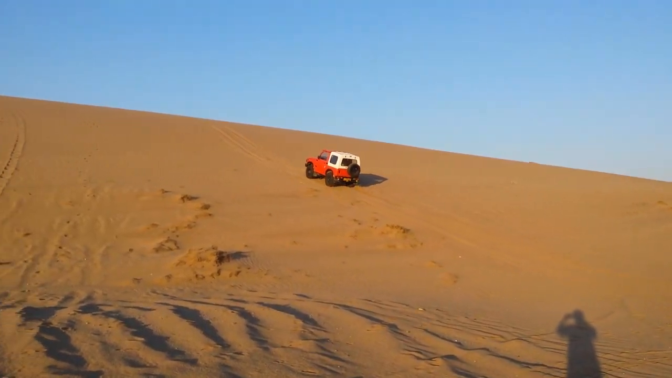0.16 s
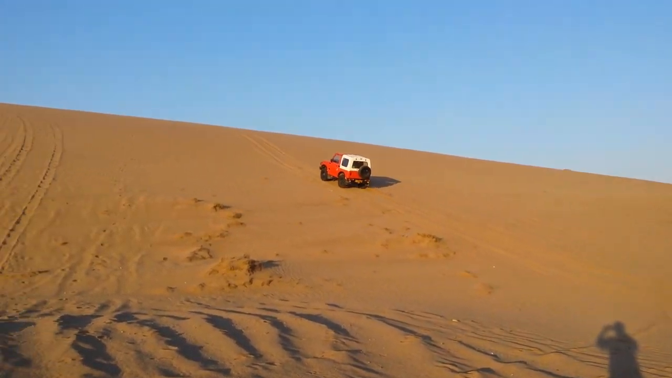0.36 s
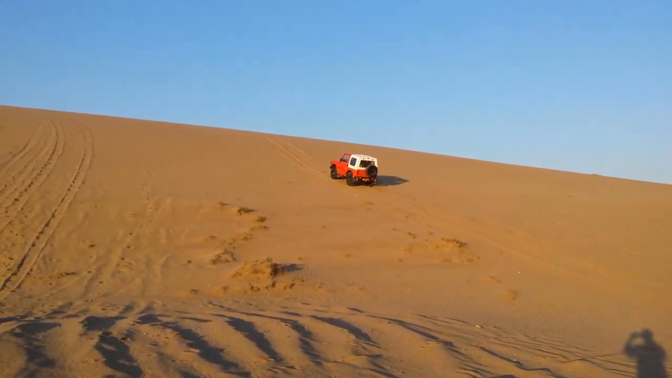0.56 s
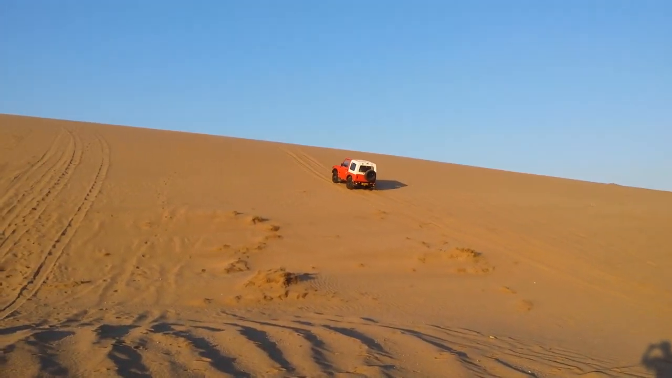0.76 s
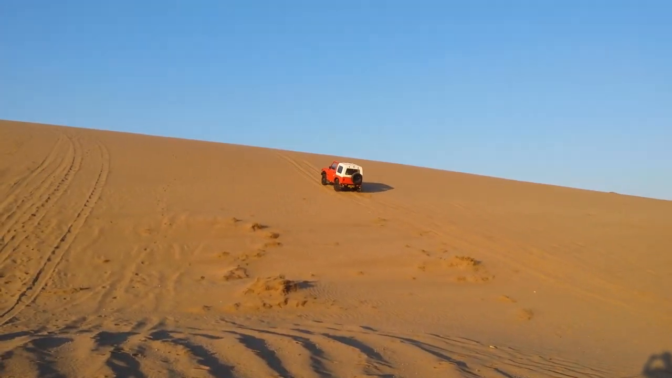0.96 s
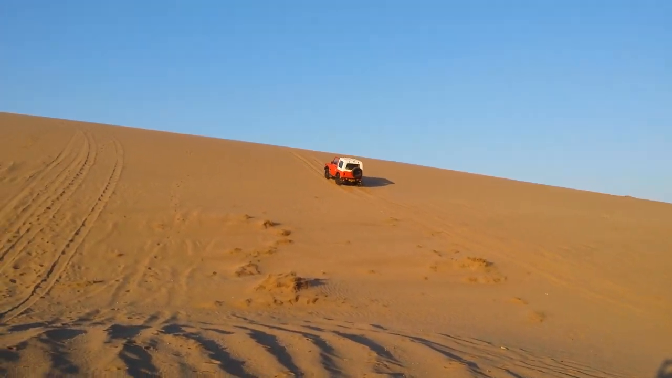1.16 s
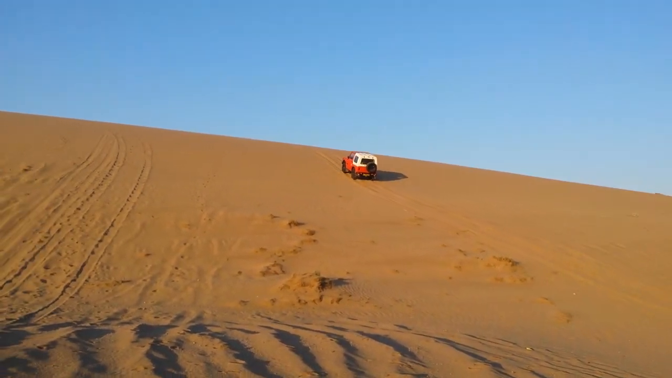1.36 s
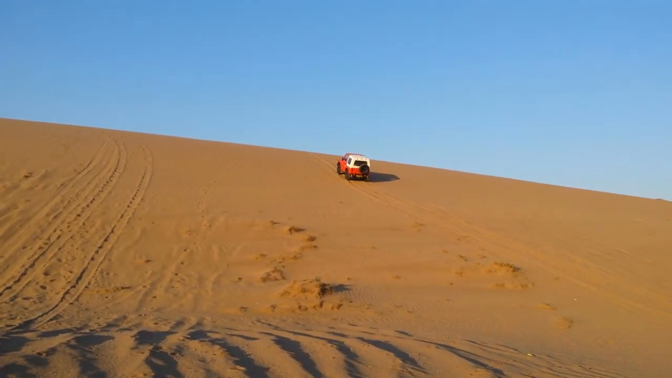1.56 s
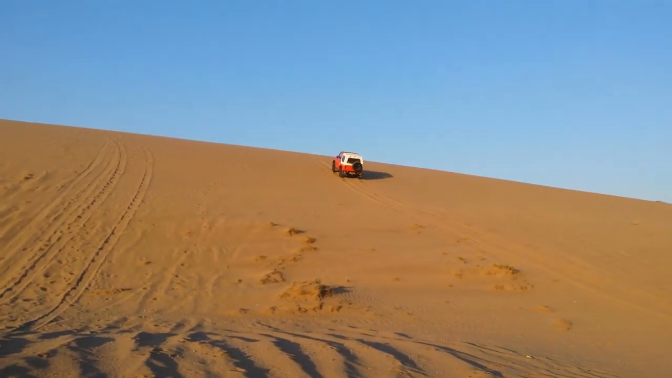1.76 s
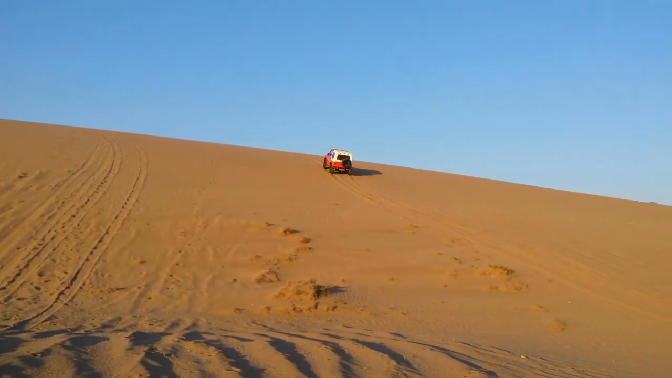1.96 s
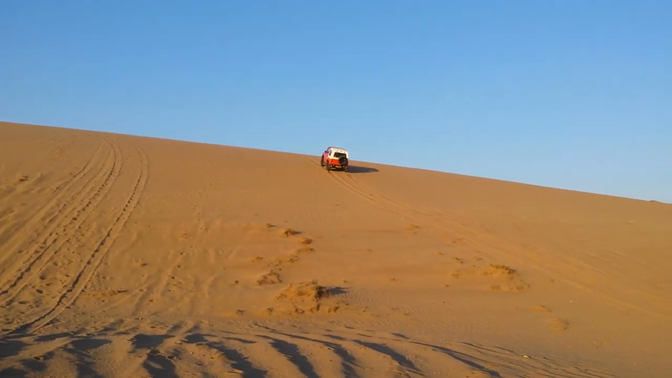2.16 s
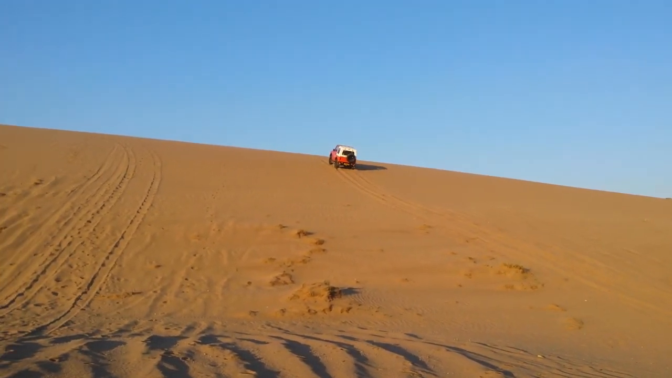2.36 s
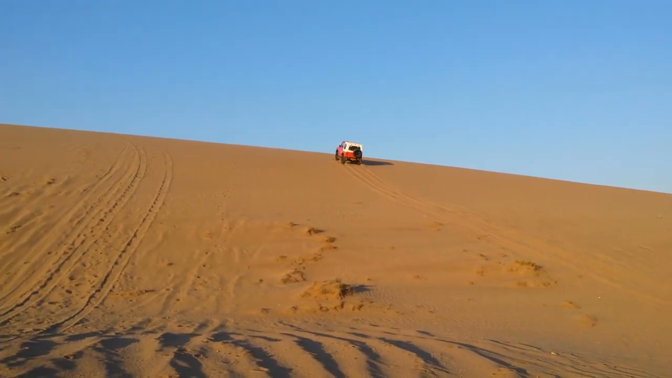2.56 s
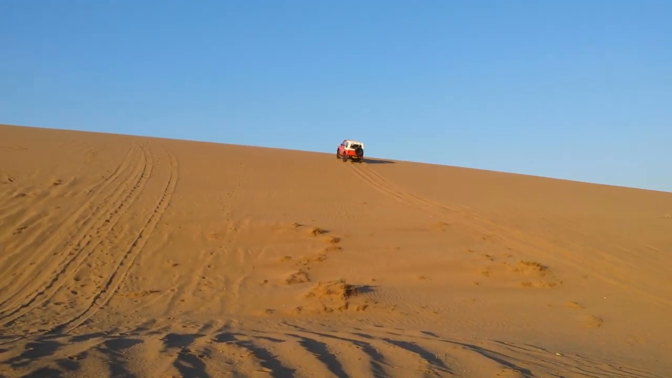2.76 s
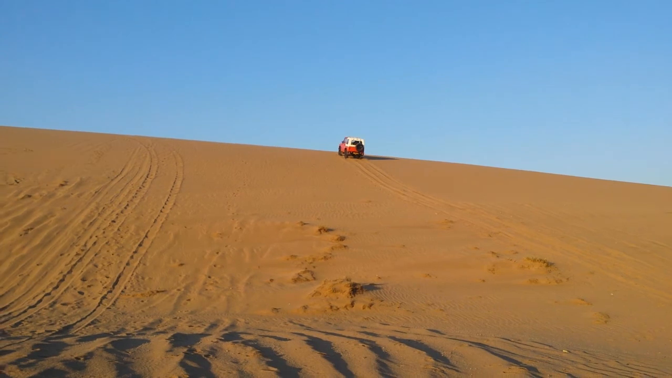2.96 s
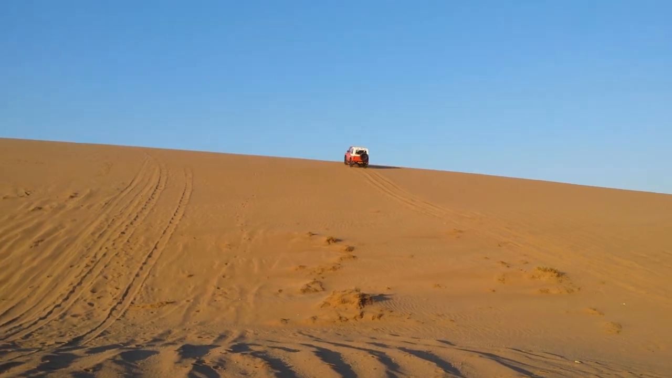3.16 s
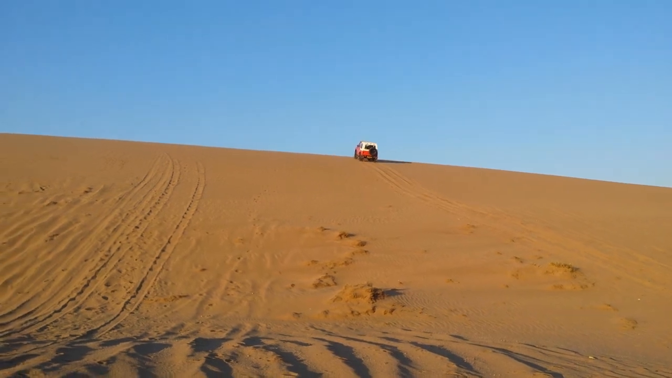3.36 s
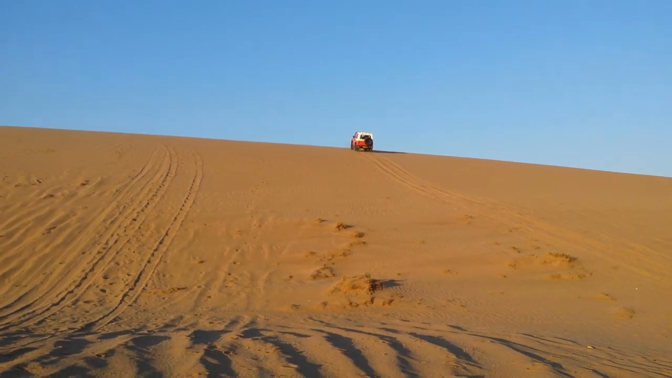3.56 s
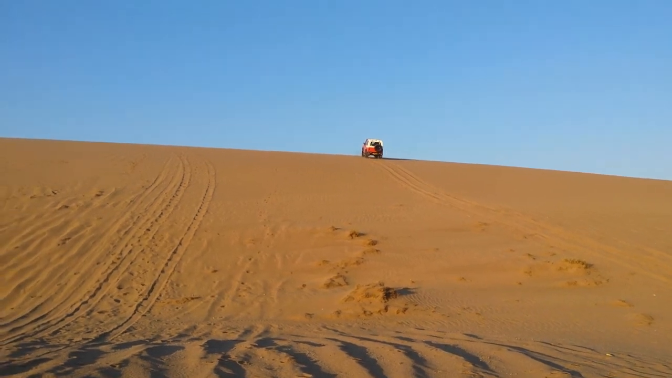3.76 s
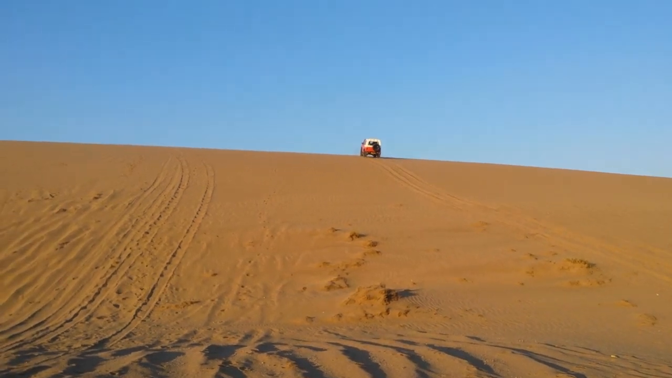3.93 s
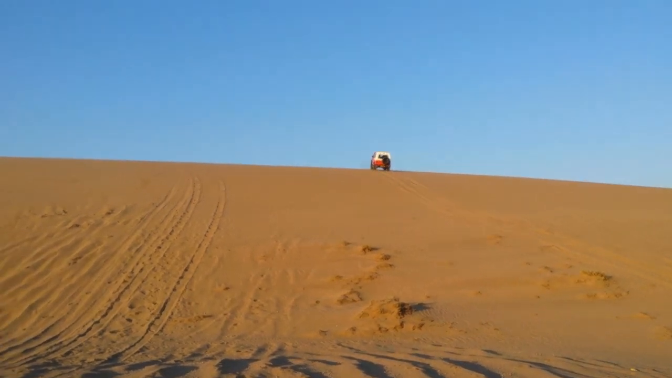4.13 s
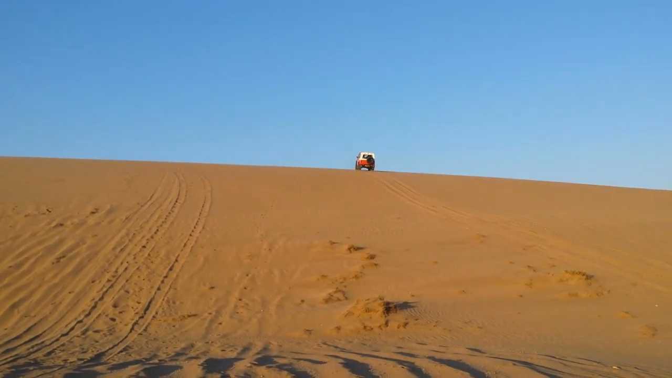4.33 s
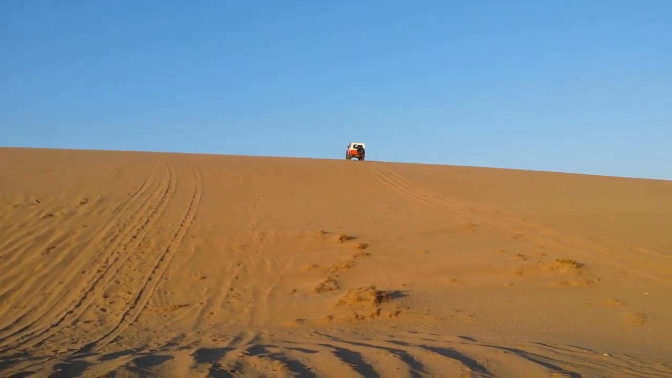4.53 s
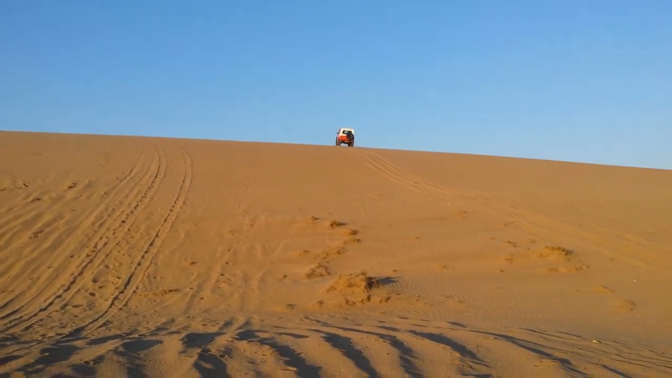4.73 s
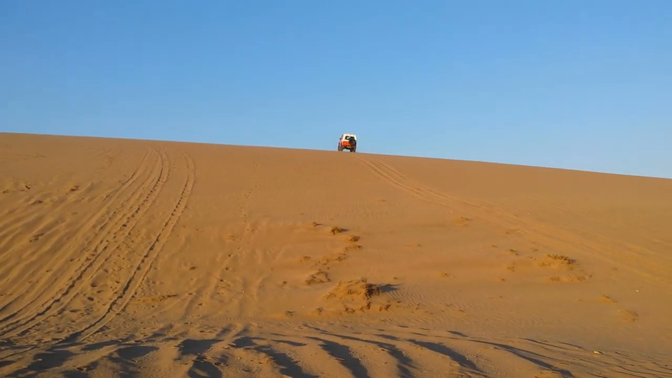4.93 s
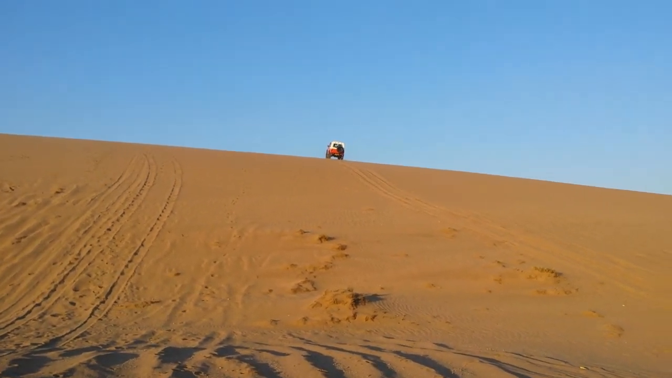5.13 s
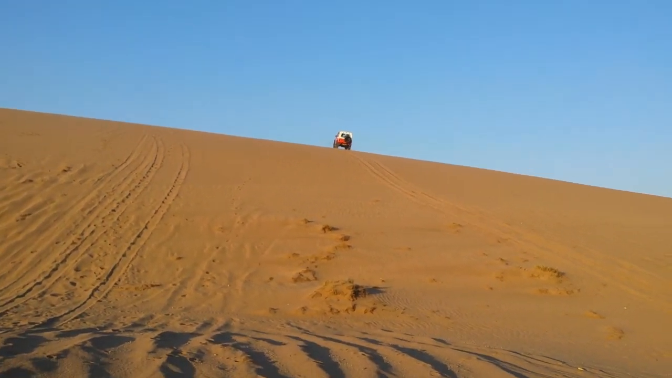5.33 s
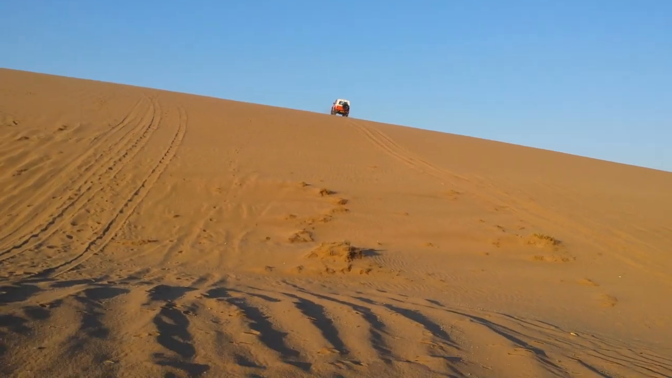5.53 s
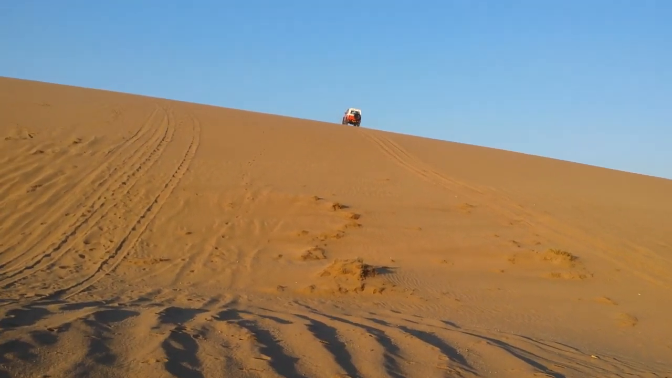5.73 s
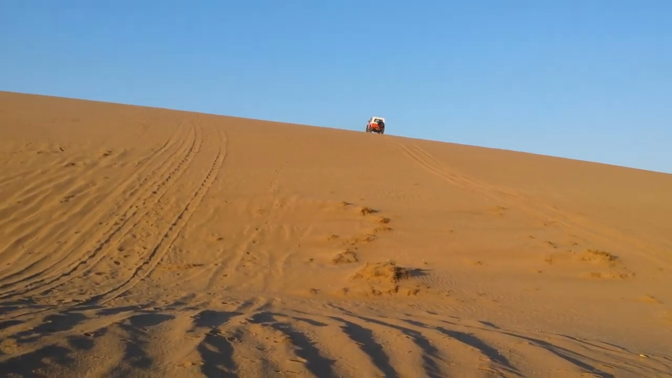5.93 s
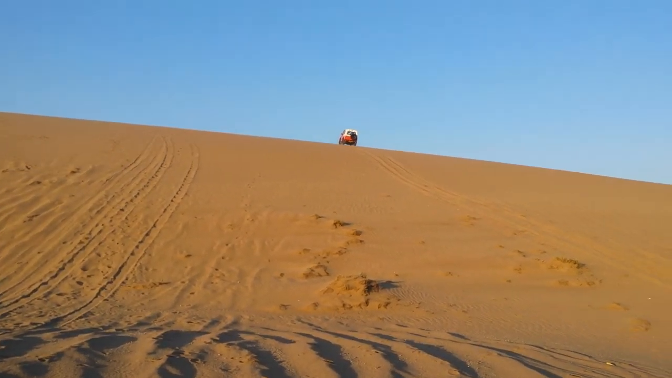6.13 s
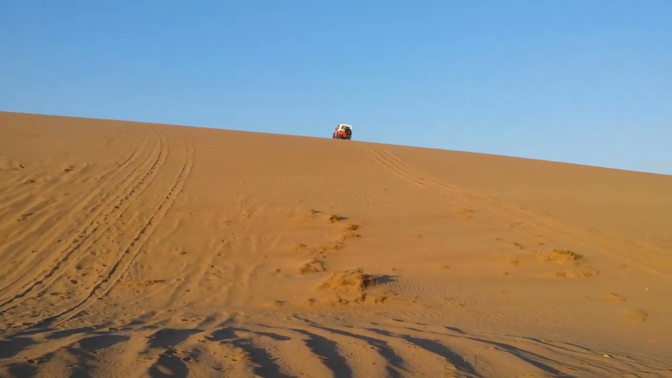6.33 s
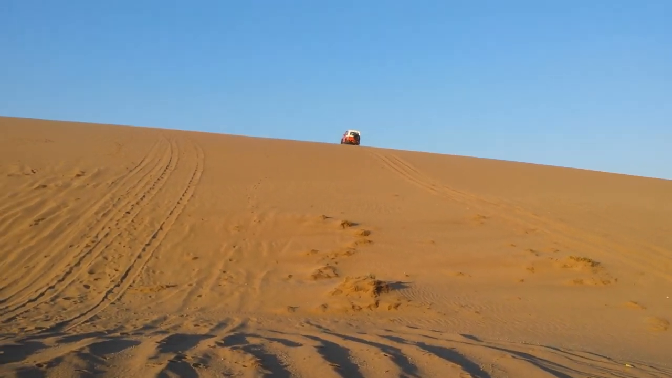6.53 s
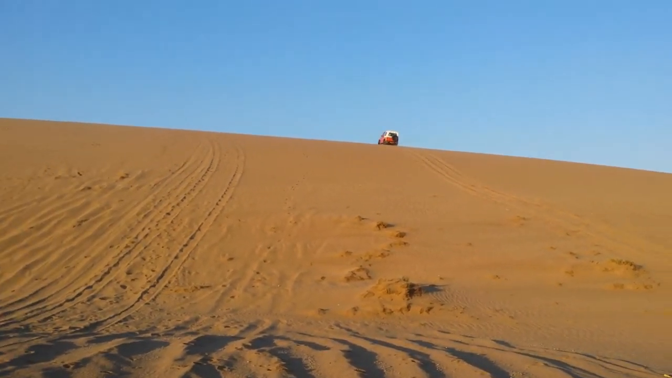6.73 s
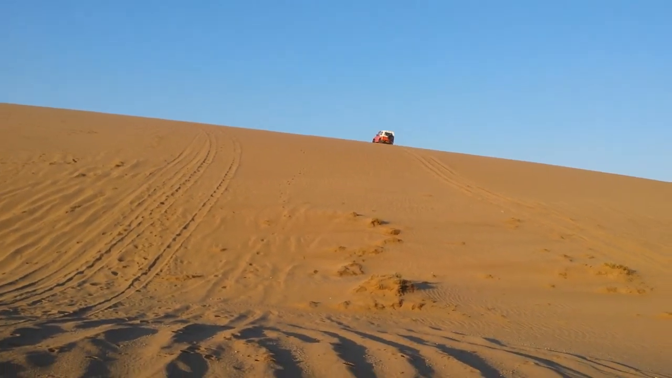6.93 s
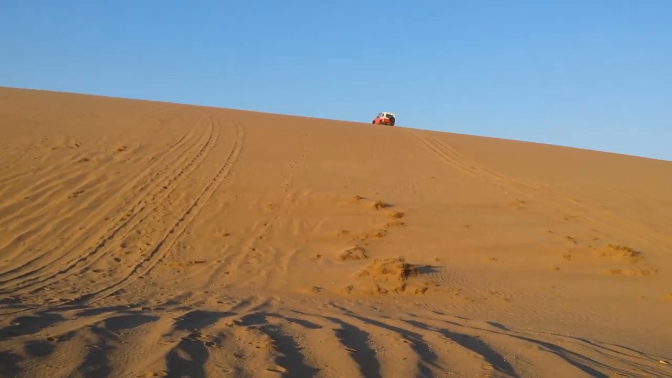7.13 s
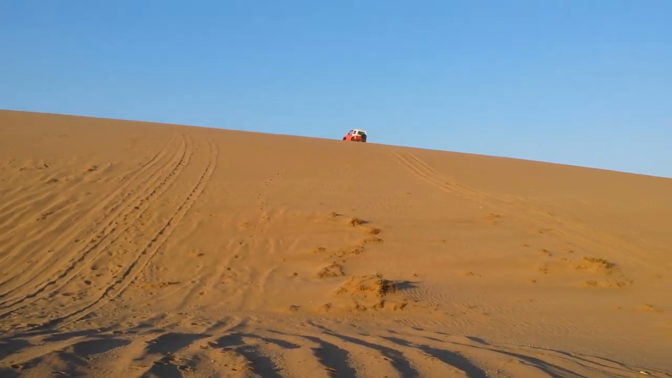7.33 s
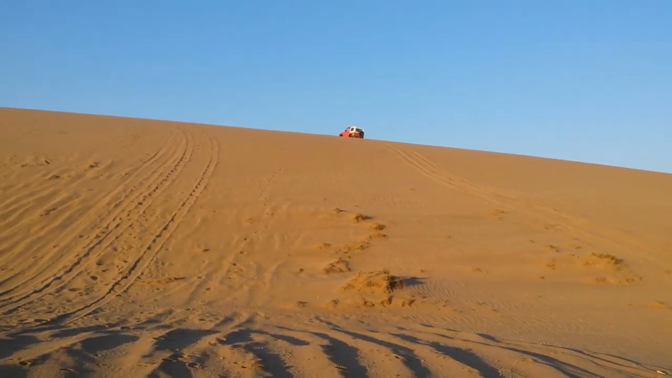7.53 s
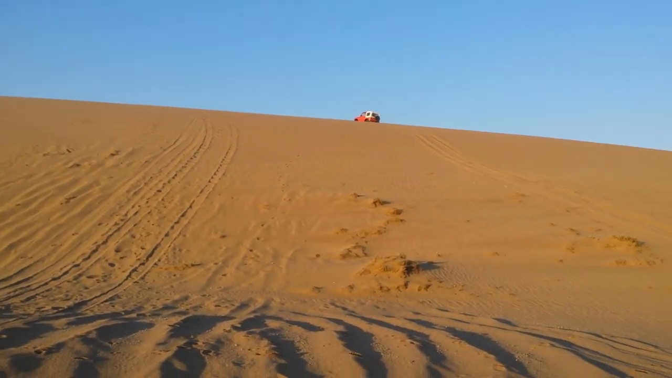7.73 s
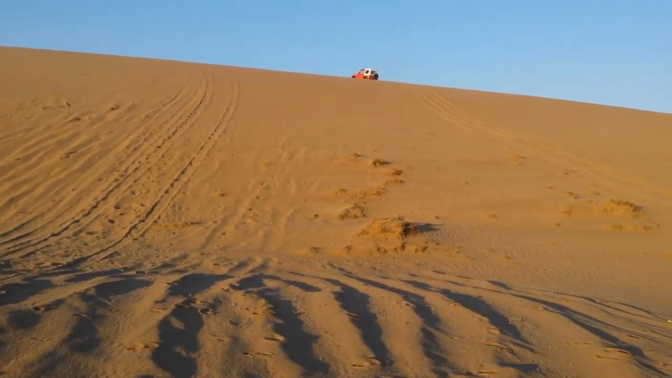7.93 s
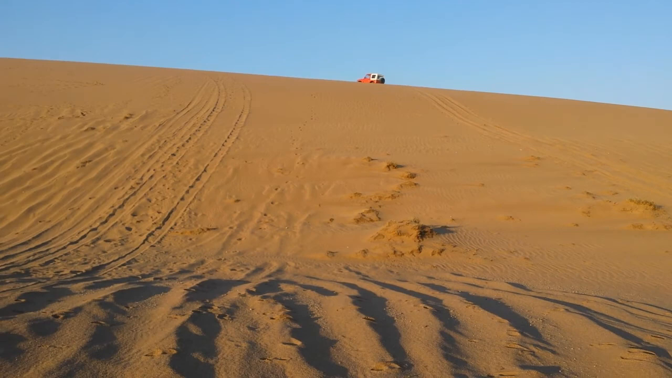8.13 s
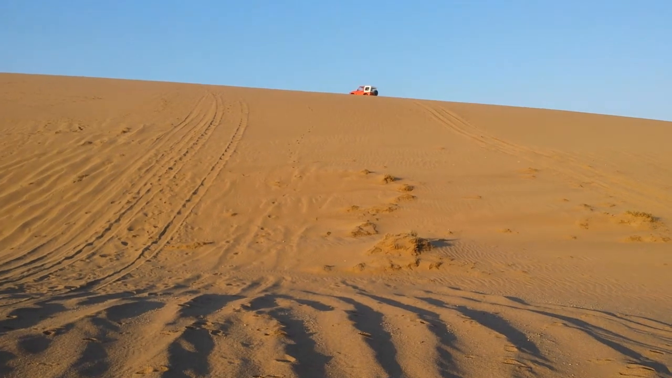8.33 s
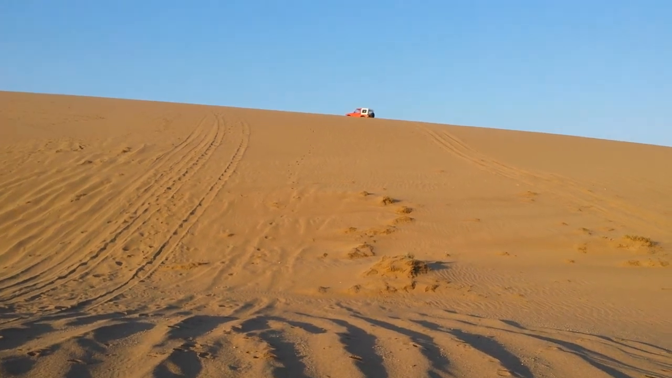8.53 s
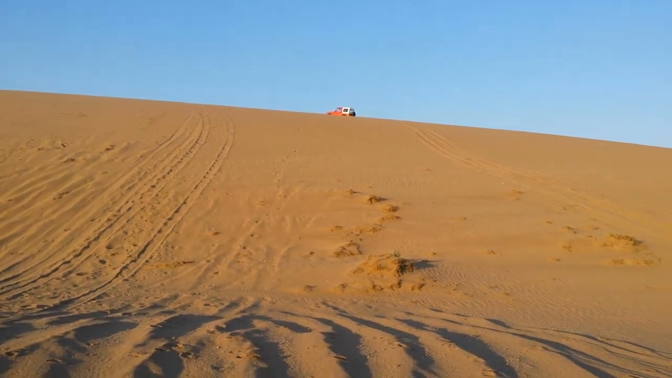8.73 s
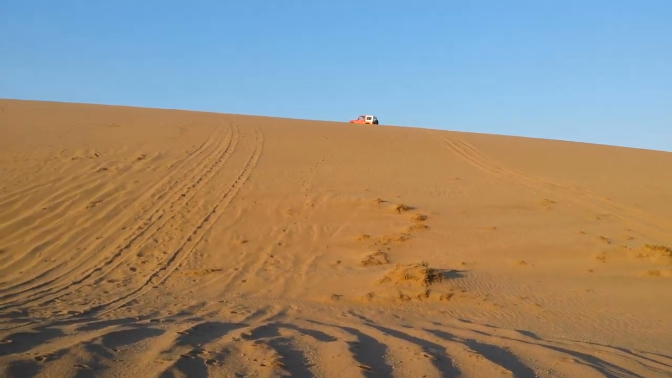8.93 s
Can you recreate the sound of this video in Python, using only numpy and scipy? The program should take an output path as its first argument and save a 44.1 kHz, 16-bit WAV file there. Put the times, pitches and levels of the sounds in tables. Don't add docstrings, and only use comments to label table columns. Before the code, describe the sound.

In open desert, a small four-cylinder off-roader revs hard, its exhaust booming and snarling with a gritty rasp. The pitch sags as it climbs, two quick throttle lifts drop it at about three seconds, then it surges up again and drops behind the crest, growing dull and faint. Close to the stereo microphone, sand crunches underfoot, the casing ticks, and a breeze buffets the left side.

```python
import sys
import numpy as np
from scipy import signal
from scipy.fft import rfft, irfft, next_fast_len
from scipy.io import wavfile
from scipy.ndimage import uniform_filter1d, map_coordinates

SR = 44100
rng = np.random.default_rng(int(sys.argv[2]) if len(sys.argv) > 2 else 0)


def to_wav(sig):
    pcm = np.clip(np.atleast_2d(sig), -1, 1) * 32767
    pcm = np.round(pcm).astype(np.int16)
    wavfile.write(sys.argv[1], SR, pcm.T)


def invert_db(level):
    return 10 ** (np.asarray(level, dtype=float) / 20)


N = 396459
TIME = np.arange(N) / SR

# [t/s, delay/ms, share of the clatter, share of the rasp]
SAND_ECHO = [(0, .76, .15, .12), (.7, .82, .15, .15), (1.2, 1.0, .3, .38), (2, 1.15, .6, .3),
             (2.5, 1.25, .6, .45), (3.1, 1.36, .6, .4), (4, 1.41, .65, .48), (5, 1.43, .55, .35),
             (5.8, 1.43, .3, .2)]
# [t/s, extra delay/ms, share]
SAND_SINK = [(0, 0.12, 0.88), (1, .17, 0.79), (2, 0.28, 0.57), (3, 0.2, 0.53), (4, .22, 0.98),
             (5.2, .22, 0.83), (6.2, 0.21, 0.39), (8.99, 0.48, 0.42)]
CYLINDER_SPREAD = [0.3, 0.9, -2.1, -1.8]


def vehicle():
    shut, hz = throttle()
    first_db, second_db, third_db, snarl_db, uneven, clatter_db, rasp_db = levels(shut, hz)
    turns, clicks, blows = firings(hz, uneven)
    lines = exhaust_lines(hz, turns, first_db, second_db, third_db)
    snarl = pipe_snarl(turns, clicks, blows, snarl_db, uneven)
    clatter = block_clatter(turns, blows, clatter_db)
    rasp = tailpipe_rasp(turns, blows, rasp_db)
    return lines + rumble(first_db) + off_sand(snarl, clatter, rasp)


def throttle():
    # [t/s, firing rate f/Hz]
    speed = [(0, 122.1), (.7, 116), (1.38, 105.8), (2.0, 99.23), (2.8, 96.37), (3.1, 98.53), (3.44, 119.4),
             (3.92, 121.1), (4.11, 130.9), (4.3, 117), (4.51, 122.6), (4.7, 111.6), (5.11, 101.9),
             (5.58, 96.94), (6.16, 85.2), (6.61, 89.75), (7.6, 86.88), (8.99, 74.6)]
    # [t/s, time shut/s, closing time/s, speed lost/Hz]
    lifts = [
        (2.859, .135, 0.029, 17),
        (3.091, .15, 0.076, 14),
    ]
    open_s, sag_lead_s, regain_s = 0.031, 0.026, 0.12
    shut, hz = np.zeros(N), curves(speed)[0]
    for s, length, close_s, lost_hz in lifts:
        closing = (TIME - s) / close_s
        opening = (s + length + open_s - TIME) / open_s
        shut = shut + np.clip(np.minimum(closing, opening), 0, 1)
        low = s + length - sag_lead_s
        sagging = (TIME - s + sag_lead_s) / length
        regaining = 1 - (TIME - low) / regain_s
        hz = hz - lost_hz * np.clip(np.minimum(sagging, regaining), 0, 1)
    return shut, uniform_filter1d(hz, size=700)


def levels(shut, hz):
    # [t/s, reach of the low tones/dB, line of sight/dB, aim of the tailpipe/dB]
    path = [(0, -10, -32, -6.5), (.92, -11.5, -37.5, -7.5), (1.0, -10, -36.5, 0), (1.7, -9, -39.5, -0.5),
            (1.85, -9.5, -41, -6), (2.3, -9, -39, -5), (2.42, -10, -40, -1), (2.85, -9.5, -39.5, -8.5),
            (3.38, -14, -41.5, 3.5), (4.06, -17.5, -42, -2.5), (4.6, -24, -45.5, -0.5),
            (4.8, -18.5, -49, -5), (5.3, -23, -52, -5), (6.16, -22.5, -56.5, -11),
            (6.45, -15.5, -51.5, -11), (7.2, -22.5, -59.5, -9), (8.25, -23.5, -62, -10),
            (8.99, -30, -58.5, -9)]
    # [t/s, unevenness 0-1]
    roughness = [(0, .58), (.9, .5), (1.2, .1), (2.85, .18), (3.3, .55), (4.55, .55), (4.72, .2), (5.3, .4),
                 (6.1, .35), (6.4, .2), (7.3, .3), (8.99, .42)]
    # [f/Hz, level/dB]
    first_response = [(70, -4), (85, -18.5), (105, -16.5), (120, -11.5), (135, -8)]
    second_response = [(140, -12), (160, -7.5), (178, -3.5), (200, -2), (215, -3.5), (232, -4.5),
                       (243, -9.5), (265, -33)]
    third_response = [(210, 6.5), (260, 2.5), (295, 1), (320, 7.8), (350, 1), (400, 1)]
    third_sight, snarl_sight = 0.8, 0.4
    reach, sight, aim = curves(path)
    cut = -15 * shut
    flutter = drift(16, count=6)
    loose = 1 + 2.1 * shut
    first = reach + read(first_response, hz) + 0.65 * cut + loose * flutter[0]
    second = reach + read(second_response, 2 * hz) + 0.66 * cut + 0.98 * loose * flutter[1]
    third = third_sight * sight + (1 - third_sight) * reach
    third = third + read(third_response, 3 * hz) + 0.37 * cut + 2.24 * flutter[2]
    snarl = snarl_sight * sight + (1 - snarl_sight) * reach
    snarl = snarl - 8.5 + 0.86 * cut + 0.8 * flutter[3]
    uneven = np.clip(curves(roughness)[0] + 0.05 * flutter[4], 0, 1)
    clatter = sight + 0.6 * cut
    rasp = sight + aim + 0.76 * cut + 0.45 * flutter[5]
    return first, second, third, snarl, uneven, clatter, rasp


def firings(hz, uneven):
    runner_ms = [0.055, 1, -0.65, 0.13]
    turns = np.cumsum(hz) / SR
    fired = np.flatnonzero(np.diff((turns + 1.02).astype(int)))[1:-1]
    count = len(fired)
    chance = rng.standard_normal((1200, 3))
    late_ms = uneven[fired] * (np.resize(runner_ms, count) + 0.06 * chance[:count, 2])
    departure = 0.6 * np.resize(CYLINDER_SPREAD, count) + 0.16 * chance[2:count + 2, 0]
    clicks = np.zeros(N)
    clicks[fired + (late_ms * SR / 1000).astype(int)] = 1 + uneven[fired] * departure
    spread = np.resize(np.roll(CYLINDER_SPREAD, 2), len(chance))
    blows = np.exp(0.3 * chance[:, 0] + 2.3 * chance[:, 1] + 0.23 * spread)
    return turns, clicks, np.minimum(blows, np.exp(2.2))


def exhaust_lines(hz, turns, first_db, second_db, third_db):
    # [f/Hz, width/Hz]
    chamber_mode = (200.7, 33)
    # [order, level over the first order/dB]
    quarters = [(.5, -17.5), (.75, -11), (1.25, -29.5), (1.5, -8.5), (1.75, 1), (2.25, -7)]
    # [order, level over the third order/dB]
    near_third = [(4, -10.5), (2.75, -11), (3.25, -17)]
    out = invert_db(first_db + 3.0) * np.cos(2 * np.pi * turns + 0.2)
    out += invert_db(second_db + 2.5) * np.cos(4 * np.pi * turns)
    out += invert_db(third_db + 1.5) * sand_gain(3 * hz) * np.cos(6 * np.pi * turns - 1.5)
    centre, width = chamber_mode
    waver = drift(6.2, count=18)
    for k, (order, db) in enumerate(quarters + near_third):
        if k < len(quarters):
            level = invert_db(first_db) / (1 + ((hz * order - centre) / width) ** 2)
        else:
            level = invert_db(third_db) * sand_gain(order * hz)
        shift = 0.25 * waver[9 + k] + rng.uniform(0, 2 * np.pi)
        line = np.cos(2 * np.pi * np.round(4 * order) / 4 * turns + shift)
        out += level * invert_db(db + 1.5 + 1.3 * waver[k]) * line
    return out


def pipe_snarl(turns, clicks, blows, snarl_db, uneven):
    # [f/Hz, level/dB]
    pipe = [(250, -44.5), (320, 4), (370, 4), (450, 0), (512, 4), (537, 6), (565, 4), (690, -1.5), (728, 8),
            (765, 0.5), (820, -6), (910, -43.5), (1085, -6.5), (1400, -34.5)]
    ringing = invert_db(snarl_db - 2.5) * causal(clicks, pipe)
    gas = rng.standard_normal(N) * (0.8 + puffs(turns, blows, -0.03, 0.6, 0.2))
    growl = invert_db(snarl_db - 13 + 14 * uneven) * coloured(gas, pipe)
    return beyond_crest(ringing) + growl


def beyond_crest(snarl):
    # [f/Hz, width/Hz, level/dB]
    long_modes = [(382, 89, -2.5), (532.4, 40, -5), (713.5, 52, -4.5), (1063, 40, -1.5)]
    crest_s, cross_s = 4.48, 0.7
    size = next_fast_len(N)
    hz = np.fft.rfftfreq(size, 1 / SR)
    gain = invert_db(-14.5)
    for f, width, db in long_modes:
        gain = gain + invert_db(db) / (1 + (2 * (hz - f) / width) ** 2)
    thinned = irfft(rfft(snarl, size) * gain, size)[:N]
    behind = np.clip((TIME - crest_s) / cross_s, 0, 1)
    return (1 - behind) * snarl + behind * invert_db(4.0) * thinned


def block_clatter(turns, blows, clatter_db):
    # [f/Hz, level per Hz/dB]
    block = [(780, -40), (830, 0.5), (920, -3), (1000, 1.5), (1100, -1.5), (1300, -1.5), (1600, -1.5),
             (2000, -4), (2300, -3), (2850, -11), (3100, -15), (3600, -15.5), (4300, -38.5)]
    swell = 2.26 + puffs(turns, blows, 0.0036, 0.36, 0.64)
    return invert_db(clatter_db - 1.5) * coloured(rng.standard_normal(N) * swell, block)


def tailpipe_rasp(turns, blows, rasp_db):
    # [f/Hz, level per Hz/dB]
    jet = [(1940, -49), (3300, -20.5), (3930, -11.5), (4800, 1), (5470, 2.5), (7040, -5), (8170, -24),
           (8940, -29.5), (12300, -24), (14400, -27.5), (15500, -32.5)]
    swell = 0.47 + puffs(turns, blows, -0.16, 0.57, 0.33)
    return invert_db(rasp_db) * coloured(rng.standard_normal(N) * swell, jet)


def rumble(first_db):
    flow = [(35, -11), (70, -4), (130, -1), (200, 5.5), (300, -9.5), (400, -16)]  # (f/Hz, level/dB)
    return invert_db(uniform_filter1d(first_db, size=5000) - 10) * coloured(rng.standard_normal(N), flow)


def puffs(turns, blows, start, length, power):
    place = np.clip((turns - start) % 1 / length, 0, 1)
    size = blows[(turns - start + 1).astype(int)] ** power
    return size * np.sin(np.pi * place ** 0.58) ** 2


def off_sand(snarl, clatter, rasp):
    delay_ms, clatter_share, rasp_share = curves(SAND_ECHO)
    extra_ms, snarl_share = curves(SAND_SINK)
    echo = later(snarl_share * snarl, delay_ms + extra_ms)
    echo = echo + later(clatter_share * clatter, delay_ms + 0.12)
    echo = echo + later(rasp_share * rasp, delay_ms)
    return snarl + clatter + rasp + echo


def sand_gain(hz):
    extra_ms, share = curves(SAND_SINK)
    delay_ms = curves(SAND_ECHO)[0] + extra_ms
    return abs(1 + share * np.exp(2j * np.pi * hz * delay_ms / 1000))


def ports(x):
    # [f/Hz, left minus right level/dB]
    port_balance = [(60, -2.5), (110, -2.0), (200, -2.5), (380, -2.5), (700, -2), (1290, -1), (2380, -4),
                    (4400, 3.5), (8120, -20), (15000, 0)]
    # [f/Hz, left lead/rad]
    port_phase = [(0, 0), (2760, 0.79), (3010, -1), (3530, -5), (4050, -6), (4570, -7.5), (5600, -7.5),
                  (5940, -8), (7580, -6.5), (8440, -11.5), (9390, -7), (9820, 5), (13300, -2), (15200, -2)]
    size = next_fast_len(N)
    hz = np.fft.rfftfreq(size, 1 / SR)
    lean = invert_db(np.interp(hz, *np.transpose(port_balance)) / 2)
    turn = np.exp(1j * np.interp(hz, *np.transpose(port_phase)))
    shake_ms = 0.011 * drift(14, count=1)[0]
    pair = np.array([later(x, shake_ms), later(x, -shake_ms)])
    return irfft(rfft(pair, size) * np.array([lean * turn, 1 / lean]), size)[:, :N]


def feet():
    # [t/s, length/s, level/dB]
    steps = [
        (4.829, 0.053, -43),
        (5.619, 0.1, -46),
        (5.69, 0.29, -45),
        (6.346, 0.32, -50.5),
        (6.559, 0.2, -51),
        (6.663, 0.16, -51),
        (7.363, 0.082, -45.5),
        (7.416, 0.13, -47),
        (7.513, 0.19, -54.5),
        (8.49, .12, -45),
    ]
    # [f/Hz, level per Hz/dB]
    crunch = [(530, -31), (900, 4.5), (1240, 6.5), (1330, 6), (2280, 4.5), (3740, -5), (5460, 2.5),
              (6950, -6.5), (7710, -1.5), (11700, -25), (14000, -10)]
    press = np.zeros(N)
    for s, length, db in steps:
        press += invert_db(db) * np.sin(np.pi * np.clip((TIME - s) / length, 0, 1) ** 0.8) ** 2
    lumps = invert_db(1.7 * rng.standard_normal(N // 60 + 1).repeat(60)[:N])
    grains = rng.standard_normal((3, N)) * lumps
    pair = press * coloured(grains[0] + 0.79 * grains[1:], crunch)
    return pair * invert_db(np.array([[-2.5], [2.5]]))


def casing():
    # [t/s, peak level/dB, f/Hz]
    ticks = [
        (5.322, -54, 6000),
        (5.629, -31, 12200),
        (7.266, -50, 6140),
        (7.607, -40.5, 11000),
        (7.635, -44, 6500),
        (8.875, -39, 8050),
    ]
    out, t = np.zeros(N), np.arange(200) / SR
    for s, db, hz in ticks:
        out[round(s * SR):][:200] += invert_db(db) * np.sin(2 * np.pi * hz * t) * np.exp(-t / 0.00015)
    return out * invert_db(np.array([[-3.5], [2.5]]))


def wind():
    # [middle t/s, length/s, level/dB]
    gusts = [
        (4.3, 1.96, -50),
        (7.801, 0.49, -57),
        (8.251, 0.37, -42),
        (8.53, .2, -35),
        (8.831, 0.043, -35),
        (8.972, 0.16, -44),
    ]
    # [f/Hz, level per Hz/dB]
    buffeting = [(12, -46), (20, -24), (81, -6.5), (147, -13.5), (195, -62), (352, -29.5), (474, -65.5),
                 (500, -32.5), (650, -69), (1100, -120)]
    lumps = invert_db(4.5 * drift(22, count=2))
    blow = invert_db(-46.5)
    for s, length, db in gusts:
        blow = blow + invert_db(db) * np.cos(np.pi * np.clip((TIME - s) / length, -0.5, 0.5)) ** 2
    return blow * invert_db(np.array([[3.5], [-7]])) * lumps * coloured(rng.standard_normal((2, N)), buffeting)


def insects():
    # [t/s, length/s, f/Hz, level/dB]
    chirrs = [
        (5.06, 0.29, 7820, -58),
        (7.7, .1, 6565, -64),
        (7.87, 0.18, 7420, -64),
        (8.56, .14, 7600, -61),
    ]
    width_hz = 240
    r = np.exp(-np.pi * width_hz / SR)
    out = np.zeros(N)
    for s, length, hz, db in chirrs:
        t = np.arange(0, length, 1 / SR)
        noise = [1, 1j] @ rng.standard_normal((2, N // 16))[:, :len(t)]
        slow = signal.lfilter([1], [1, -2 * r, r * r], noise)
        buzz = evened((slow * np.exp(2j * np.pi * hz * t)).real)
        out[round(s * SR):][:len(t)] += invert_db(db) * np.sin(np.pi * t / length) * buzz
    return out * invert_db(np.array([[-3], [2.5]]))


def hiss():
    # [f/Hz, level per Hz/dB]
    floor = [(530, -37), (900, -12), (967, -5), (1180, -2.5), (1330, -5.5), (1630, -18), (2930, -10.5),
             (4950, -4.5), (5710, -6.5), (6360, -3.5), (15600, -14)]
    return invert_db(-59 + np.array([[-1.5], [4.5]])) * coloured(rng.standard_normal((2, N)), floor)


def evened(x):
    return x / np.sqrt(np.mean(x ** 2) + 1e-20)


def curves(rows):
    s, *columns = np.transpose(rows)
    return [np.interp(TIME, s, c) for c in columns]


def drift(per_s, count):
    knots = rng.standard_normal((count, 400))
    return np.array([np.interp(TIME * per_s, np.arange(len(k)), k) for k in knots])


def read(points, hz):
    f, db = np.transpose(points)
    return np.interp(np.log(hz + 1), np.log(f + 1), db, left=-120, right=-120)


def coloured(x, points):
    size = next_fast_len(N)
    gain = invert_db(read(points, np.fft.rfftfreq(size, 1 / SR)))
    return evened(irfft(rfft(x, size) * gain, size)[..., :N])


def causal(x, points):
    db = read(points, abs(np.fft.fftfreq(16384, 1 / SR)))
    log_gain = np.log(invert_db(np.maximum(db, -70)))
    ring = np.fft.ifft(np.exp(np.conj(signal.hilbert(log_gain)))).real[:4096]
    return evened(signal.oaconvolve(x, ring)[:N])


def later(x, delay_ms):
    return map_coordinates(x, [np.arange(N) - delay_ms * SR / 1000], order=3)


def scene():
    return ports(vehicle()) + feet() + casing() + wind() + insects() + hiss()


def low_pass(x):
    return signal.sosfilt(signal.butter(12, 15710, fs=SR, output="sos"), x)


def record(dry):
    return low_pass(dry)


dry = scene()
out = record(dry)
to_wav(out)
```